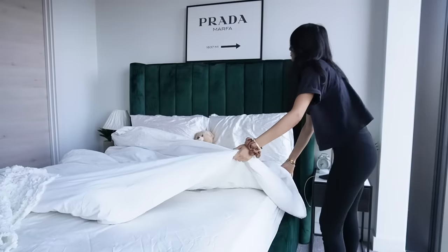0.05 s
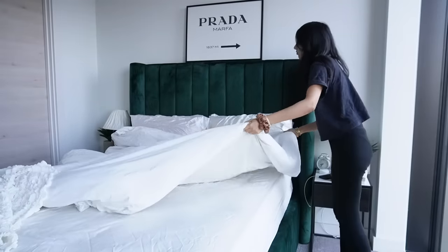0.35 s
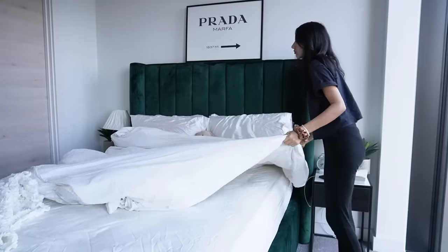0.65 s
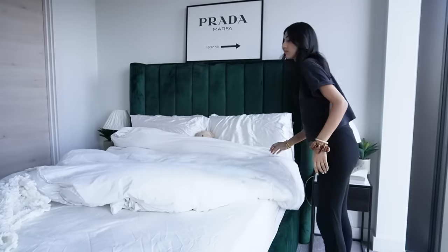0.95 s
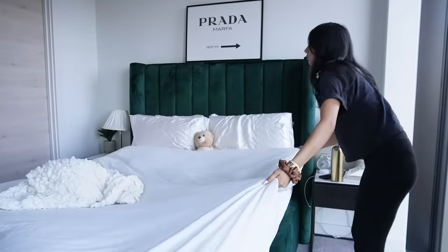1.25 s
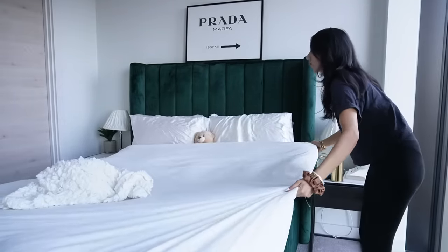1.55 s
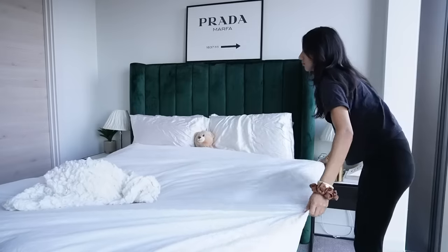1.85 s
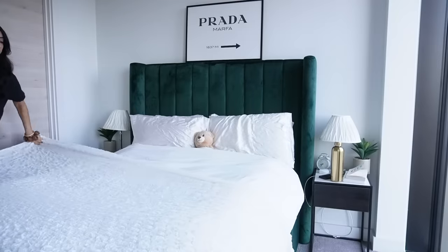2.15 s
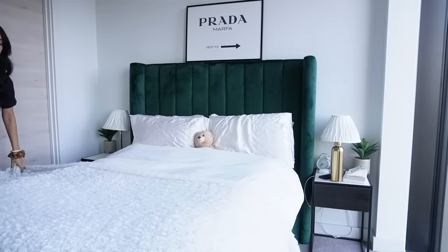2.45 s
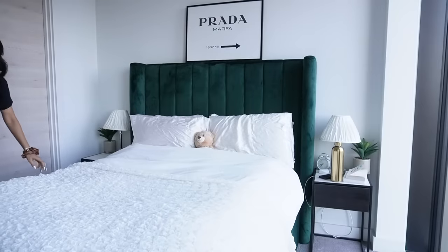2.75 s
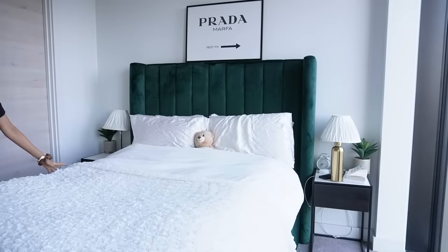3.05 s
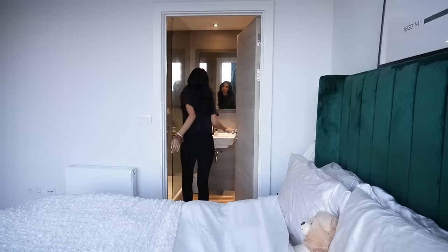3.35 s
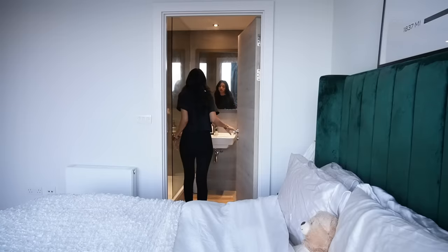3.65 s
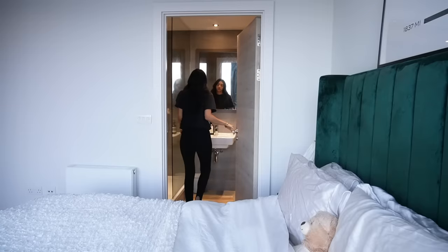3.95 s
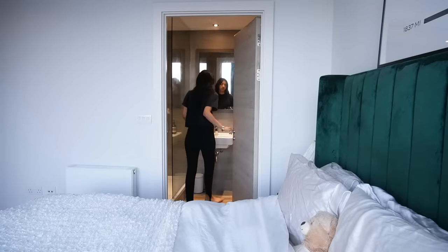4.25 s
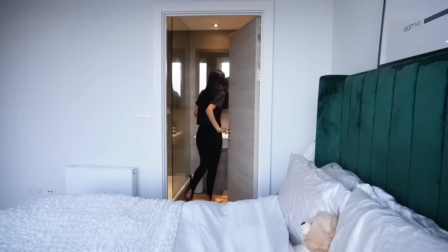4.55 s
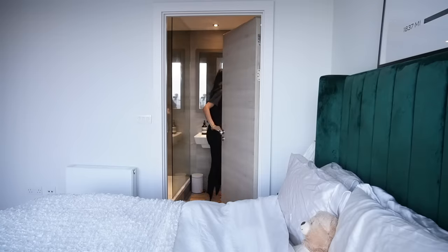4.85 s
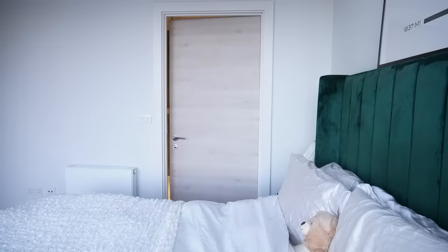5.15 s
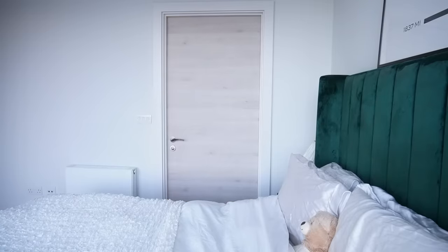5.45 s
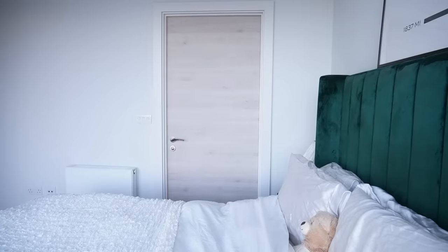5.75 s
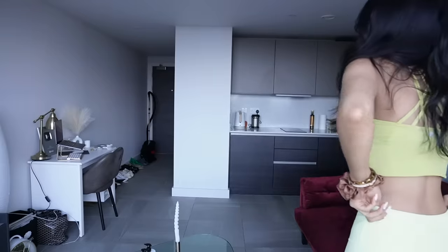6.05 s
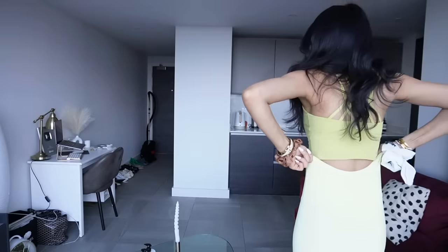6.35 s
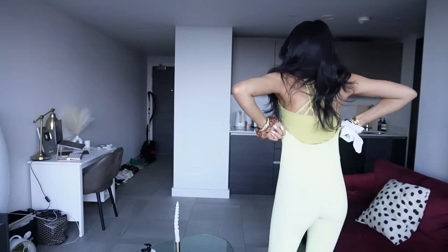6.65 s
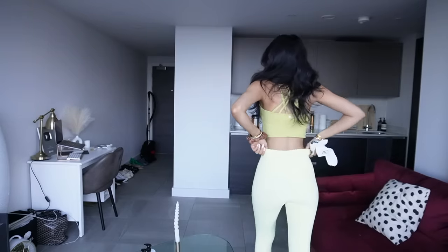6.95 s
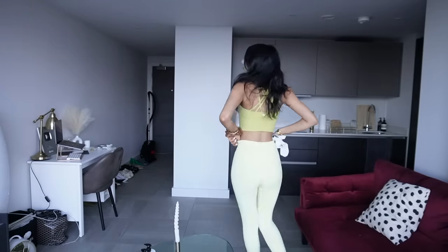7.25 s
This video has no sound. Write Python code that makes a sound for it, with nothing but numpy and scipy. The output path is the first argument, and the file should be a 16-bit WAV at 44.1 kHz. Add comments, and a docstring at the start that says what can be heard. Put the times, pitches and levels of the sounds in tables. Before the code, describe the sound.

In a quietly humming bedroom, a duvet is shaken, pulled and smoothed with swishes and soft puffs of air. Bracelets jingle and small hard things click at a bathroom basin. A door then shuts with a metal latch clack and a loud, booming thud. Finally, stretchy clothes are tugged up and a waistband snaps on skin, the bracelets now closer to the single microphone.

```python
"""Duvet, door and waistband

Three spots in a flat, one straight after the other, on one mono microphone. In a humming bedroom a duvet
is shaken, pulled and smoothed, cloth rubbing on cloth. Bracelets jingle at the bathroom basin, then the
door swings shut with a latch clack and a booming thud, held down by a limiter. In the living room, the
bracelets now nearer the microphone, tight clothes are tugged up and the waistband snaps on skin."""
import sys
import numpy as np
from scipy import signal
from scipy.fft import rfft, irfft, next_fast_len
from scipy.io import wavfile
from scipy.ndimage import uniform_filter1d

SR = 44100
rng = np.random.default_rng(int(sys.argv[2]) if len(sys.argv) > 2 else 0)


def bounce(signal):
    """Save signal as a 16-bit WAV file at the path given by the first command-line argument."""
    frames = np.transpose(np.atleast_2d(signal))
    limited = np.clip(frames, -1, 1)
    pcm = np.round(limited * 32767).astype(np.int16)
    wavfile.write(sys.argv[1], SR, pcm)


N = 321930
BATHROOM_S, LIVING_S = 3.12, 5.826   # when the second and third spots begin
TIME = np.arange(N) / SR
AGE = np.arange(SR) / SR   # seconds since a blow


def from_db(db):
    """Decibels to gain."""
    return 10 ** (np.asarray(db) / 20)


def rms_one(x):
    """Scale to unit rms."""
    return x / np.sqrt(np.mean(x ** 2) + 1e-20)


def fade(t60):
    """Decay of 60 dB in t60 seconds."""
    return np.exp(-np.log(1000) * AGE / t60)


def during(start, end, edge_s=0.0043):
    """One between start and end, with short ramps."""
    return np.clip(np.minimum(TIME - start, end - TIME) / edge_s + .5, 0, 1)


def add(out, start_s, sound):
    """Mix a sound in at the given time."""
    at = max(round(start_s * SR), 0)
    out[at:at + len(sound)] += sound[:N - at]


def drift(rate_hz):
    """A slow random wander with a spread of about 1."""
    knots = np.arange(0, N / SR + 1, 1 / rate_hz)
    return np.interp(TIME, knots, rng.standard_normal(N // 40)[:len(knots)]) * np.sqrt(3 / 2)


def colour(x, spectrum):
    """Causal (minimum-phase) filter with the given spectrum; white noise keeps its power."""
    size = 2 * next_fast_len(len(x) // 2 + SR // 20)
    hz, db = np.transpose(spectrum)
    log_bins = np.log(np.fft.rfftfreq(size, 1 / SR) + 1)
    gain = rms_one(from_db(np.interp(log_bins, np.log(hz), db)))
    cepstrum = irfft(np.log(gain))
    cepstrum[1:size // 2] *= 2
    cepstrum[size // 2 + 1:] = 0
    return irfft(rfft(x, size) * np.exp(rfft(cepstrum)))[:len(x)]


def resonate(x, hz, width):
    """One resonance; white noise keeps its power."""
    radius = np.exp(-np.pi * width / SR)
    feedback = [1, -2 * radius * np.cos(2 * np.pi * hz / SR), radius ** 2]
    return signal.lfilter(np.sqrt((1 - radius ** 2) / 2) * np.array([1, 0, -1]), feedback, x)


def blow(crack_db, crack_s, t60):
    """A short crack of contact, then dense room echoes that start at rms 1."""
    return rng.standard_normal(SR) * (from_db(crack_db) * np.exp(-AGE / crack_s) + fade(t60))


def room(x, wet_db, t60):
    """Direct sound reaches the microphone first, diffuse wall echoes a few milliseconds later."""
    tail = rng.standard_normal(SR) * fade(t60) * (AGE > .004)
    return x + from_db(wet_db) * signal.fftconvolve(x, tail / np.linalg.norm(tail))[:len(x)]


# still air in all three rooms: (frequency [Hz], density [dB])
AIR_COLOUR = [(15, -37), (28, -4), (48, 1), (74, -11.5), (137, -6), (175, -9), (380, -8), (480, -12.5),
              (850, -12), (1400, -21), (2800, -29), (6000, -32.5), (12000, -37.5), (16000, -41)]
# living-room ventilation: (frequency [Hz], width [Hz], level [dB])
VENT_BANDS = [(340.3, 4.2, -51.5), (512, 5.2, -58.5), (574, 11, -67)]
def room_tone(hum_hz=42.5):
    """Air all through; a building hum, strongest in the bedroom; a vent droning in the living room."""
    bedroom, living = during(-1, BATHROOM_S), during(LIVING_S, N / SR + 1)
    air = from_db(-48.5) * colour(rng.standard_normal(N), AIR_COLOUR)
    hum = np.sqrt(2) * np.sin(2 * np.pi * hum_hz * TIME + .15 * drift(5))
    hum_gain = from_db(-47.5) * bedroom + from_db(-53) * living
    rumble = from_db(-56.5) * resonate(rng.standard_normal(N), hz=81, width=70)
    vent = sum(from_db(db) * resonate(rng.standard_normal(N), hz, width) for hz, width, db in VENT_BANDS)
    return air + hum * hum_gain + rumble * bedroom + vent * living


def friction(spectrum, slips_per_s, slip_db, spread_db):
    """A smooth rush of threads plus separate slips of creases, split into folds, rubbing and hiss."""
    sizes = from_db(spread_db * np.minimum(rng.exponential(1, N), 4)) * rng.choice([-1, 1], N)
    slipping = rng.random(N) < slips_per_s * from_db(4 * drift(25)) / SR
    rub = colour(rng.standard_normal(N) + from_db(slip_db) * rms_one(sizes * slipping), spectrum)
    return [rms_one(signal.sosfilt(signal.butter(3, edges_hz, "band", fs=SR, output="sos"), rub))
            for edges_hz in [(110, 700), (700, 3500), (3500, 17000)]]


def stroke_speed(start, rise, hold, release):
    """A stroke gathers speed, keeps it, then slows to a tenth in each release time."""
    age = TIME - start
    gathering = np.sin(np.pi / 2 * np.clip(age / rise, 0, 1))
    slowing = 10 ** -np.clip((age - rise - hold) / release, 0, 10)
    return gathering * slowing


def stroke_gains(strokes, exponents=(0.86, 0.93, 1.12)):
    """Folds, rubbing and hiss each grow with the cloth's speed; overlapping strokes add in power."""
    power = np.zeros((3, N))
    for start, rise, hold, release, db, folds_db, hiss_db in strokes:
        speed = stroke_speed(start, rise, hold, release)
        for k, above_db in enumerate((folds_db, 0, hiss_db)):
            power[k] += (from_db(db + above_db) * speed ** exponents[k]) ** 2
    return np.sqrt(power)


def pull(registers, gains, flutter_db):
    """Cloth in motion; the heavy folds flutter most, the thread hiss least."""
    return sum(noise * gain * from_db(flutter_db * drift(45) / (k + 1))
               for k, (noise, gain) in enumerate(zip(registers, gains)))


# the duvet is lifted, billows, is pulled taut, swept flat and sinks into place: (time [s], rise [s],
# hold [s], release [s], rubbing level [dB], folds above rubbing [dB], hiss above rubbing [dB])
DUVET_STROKES = [ (-0.02, 0.02, 0.14, 1, -40.5, -3.5, -8.5), (0.15, 0.087, 0.19, 0.74, -41, 2, -6.5),
                 (0.42, 0.13, 0.21, 0.05, -41.5, -4, -3), (0.73, .045, 0.057, 0, -44.5, -3, 2),
                 (0.77, 0.052, 0.11, 0.1, -39.5, 1, -9), (1.033, 0.025, .12, 0.66, -33.8, -3.5, -7.5),
                 (1.28, 0.054, .03, 1, -44.5, -1, -0.5), (1.5, 0.057, .16, 0.34, -40.5, -1, -7),
                 (1.8, 0.083, 0.074, 0.16, -39, -2.5, -.5), (1.97, 0.043, .05, .2, -41.5, 0, -14),
                 (2.077, 0.016, 0.099, 0.29, -31, -7.5, -3), (2.35, .1, .2, 0.15, -45, -4, -4),
                 (2.6, 0.093, 0.31, 0.48, -53.5, 4, -20), ]
# its cloth when shaken, smoothed and swept: (frequency [Hz], density [dB])
SHAKE_COLOUR = [(59, -39), (100, -4), (224, -3), (283, 0.5), (415, -2.5), (524, 0), (648, -5.5),
                (705, -3.5), (2800, -14.5), (8280, -14.5), (10900, -22), (14700, -26), (16000, -34)]
SMOOTH_COLOUR = [(60, -37), (110, -16), (180, -10.5), (320, -0.5), (430, -4), (800, -4), (1300, -4.5),
                 (1800, -6.5), (2300, -10), (5000, -15), (8800, -15.5), (11000, -23.5), (16000, -27)]
SWEEP_COLOUR = [(60, -30), (110, -17), (200, -3), (430, -2), (600, -1.5), (1000, -1), (1700, -2.5),
                (2500, -6.5), (5000, -16.5), (8600, -17.5), (11000, -24.5), (16000, -29)]
def duvet(smooth_s=1.037, sweep_s=2.079):
    """In the bedroom, cloth rubs on cloth: shaking, smoothing, sweeping, each taking over abruptly."""
    out = np.zeros(N)
    gains = stroke_gains(DUVET_STROKES)
    edges = [-1, smooth_s, sweep_s, BATHROOM_S]
    for spectrum, start, end in zip([SHAKE_COLOUR, SMOOTH_COLOUR, SWEEP_COLOUR], edges, edges[1:]):
        registers = friction(spectrum, slips_per_s=900, slip_db=-5.5, spread_db=3.5)
        out += pull(registers, gains, flutter_db=0.9) * during(start, end)
    return from_db(-0.28) * out


# clear knocks of the bracelets: (time [s], level [dB], favoured frequency [Hz], ring [dB])
BRACELET_KNOCKS = [(0.002, -19.5, 9500, -5.5), (0.535, -28, 14500, -5), (0.596, -28.5, 5100, 1.5),
                   (0.767, -31.5, 9000, -3), (2.895, -34.5, 12000, -5), (3.127, -37, 8000, 1),
                   (3.184, -33, 7500, 0.5), (3.248, -29.5, 14700, 0.5), (3.362, -34.5, 8000, -1.5),
                   (3.564, -43, 12300, 5), (3.6, -36, 13000, 0), (3.772, -33.5, 10000, -2),
                   (4.215, -43, 13100, 4), (6.231, -25.5, 9000, -4), (6.285, -25, 8100, -6),
                   (6.386, -22, 9900, -14), (6.834, -23.5, 11480, 4), (7.006, -25, 8900, -1)]
# their resonances: (frequency [Hz], width [Hz], level [dB])
BRACELET_MODES = [(2660, 150, -13), (3770, 120, -8.5), (4230, 80, -12), (5060, 100, -4), (7760, 75, -2),
                  (8370, 200, -11), (9560, 120, -4), (10400, 200, -18), (11000, 150, -11), (12850, 90, -12),
                  (13130, 120, -8), (14520, 90, -9), (14950, 170, -11)]
# the tick of contact: (frequency [Hz], density [dB])
TICK_COLOUR = [(1500, -6.5), (4000, -7), (8500, 2.5), (11000, -6), (15500, -4)]
def bracelets(rebounds=4):
    """Knocks and weaker rebounds ring the bangles, nearer the microphone in the living room."""
    out = np.zeros(N)
    for start, db, favoured_hz, ring_db in list(BRACELET_KNOCKS) + chatter():
        near = start > LIVING_S   # more crack, less room
        knock = blow(crack_db=3.5 + 10 * near, crack_s=0.00086, t60=0.3) * from_db(-10 - 3.6 * near)
        ring = 0
        for hz, width, mode_db in BRACELET_MODES:
            # the point of contact favours modes close to one frequency
            favour_db = 9 * np.exp(-(np.log2(hz / favoured_hz) / 0.31) ** 2)
            ring += from_db(mode_db + favour_db + rng.normal(0, 4.1)) * resonate(knock, hz, width)
        tick = from_db(-3.5) * colour(knock, TICK_COLOUR)
        add(out, start, from_db(db) * (from_db(ring_db - 13.5) * ring + tick))
        for delay in rng.uniform(0.0068, .06, rebounds):
            add(out, start + delay, from_db(db + ring_db - 29) * ring)
    return out


# puffs from taut cloth, bumps on the bed and the swinging door:
# (time [s], level [dB], pitch [Hz], half-length [cycles])
AIR_PUFFS = [(0.219, -21.5, 620, 0.58), (0.231, -30, 330, 0.98), (0.441, -31, 310, .7),
             (0.83, -37, 80, 0.65), (0.905, -39, 85, 0.71), (0.928, -18, 520, 0.55), (1.039, -30, 210, .4),
             (1.042, -27, 900, .4), (2.068, -37.5, 80.5, .6), (2.842, -34.5, 139, 1.2),
             (2.888, -34, 150, 1.2), (5.341, -25.5, 397, 0.47), (6.961, -26.5, 810, 0.85),
             (7.261, -24.5, 1110, 0.59)]
def flaps(lead_cycles=3):
    """A moving fold or panel pushes one short puff of air, heard with the room around it."""
    out = np.zeros(N)
    for time, db, hz, cycles in AIR_PUFFS:
        turn = AGE * hz - lead_cycles
        puff = np.cos(2 * np.pi * turn) * np.exp(-(turn / cycles) ** 2)
        add(out, time - (lead_cycles - 1) / hz, from_db(db) * room(puff, wet_db=-1, t60=0.32))
    return out


# a hand skims taut cloth: (time [s], level [dB], frequency [Hz], width [Hz], swell [s])
HAND_SKIMS = [(1.034, -37, 1370, 680, 0.058), (2.084, -41, 460, 160, .045), (1.9, -42, 1900, 1700, .015),
              (5.82, -40, 1400, 320, 0.065)]
def skims():
    """Taut cloth resonates under the hand: a breathy band of friction swells and dies."""
    out = np.zeros(N)
    for start, db, hz, width, swell in HAND_SKIMS:
        rush = rms_one(resonate(resonate(rng.standard_normal(SR), hz, width), hz, width))
        envelope = AGE / swell * np.exp(1 - AGE / swell)
        add(out, start, from_db(db) * rush * envelope)
    return out


# spells of wrist movement: (start [s], end [s], level [dB], favoured frequency [Hz])
WRIST_MOVES = [(3.2, 3.54, -46.5, 4800), (4.37, 4.49, -43.5, 12000), (4.668, 4.71, -49, 12000),
               (6.399, 6.47, -28, 14500), (6.75, 6.96, -31, 12700)]
def chatter(gap_s=.06, spread_db=2, ring_db=3):
    """A moving wrist jostles the bracelets: faint, uneven knocks, as rows like BRACELET_KNOCKS."""
    knocks = []
    for start, end, db, hz in WRIST_MOVES:
        for k, (late, strength) in enumerate(rng.uniform(-1, 1, size=(12, 2))):
            time = start + gap_s * (k + 0.5 + late / 4)
            if time < end:
                knocks.append((time, db + spread_db * strength, hz, ring_db))
    return knocks


# hard things handled at the basin: (time [s], level [dB], ring frequency [Hz], ring [dB])
BASIN_CLICKS = [(3.775, -53.5, 7800, 4), (3.835, -48, 3160, -1), (4.237, -33, 8540, -10),
                (4.494, -47.5, 4100, -16), (4.773, -62.5, 7300, -4), (5.331, -65, 3540, 0)]
# the tone they share: (frequency [Hz], density [dB])
BASIN_COLOUR = [(600, -47), (1000, -6), (1400, 3), (2500, -0.5), (4300, -1), (5400, 6.5), (6800, -4.5),
                (8600, 5), (10000, -15), (13000, -13), (16000, -11)]
def basin():
    """Small hard clicks echo off the bathroom tiles, each thing with its own short ring."""
    out = np.zeros(N)
    for start, db, hz, ring_db in BASIN_CLICKS:
        knock = blow(crack_db=-5, crack_s=0.0067, t60=0.45)
        ring = from_db(ring_db) * resonate(knock, hz, width=200)
        add(out, start, from_db(db) * (colour(knock, BASIN_COLOUR) + ring))
    return out


# air rushing through the door's last gap: (frequency [Hz], density [dB])
DRAUGHT_COLOUR = [(30, -6), (60, 2), (150, -8), (500, 0), (1000, -6), (2000, -13), (5000, -30),
                  (10000, -49)]
def draught(peak_db=-38, rise_s=0.05):
    """The closing door squeezes air through the narrowing gap until the latch strikes."""
    strike_s = LATCH_HITS[0][0]
    swell = np.exp(np.minimum(TIME - strike_s, 0) / rise_s) * during(BATHROOM_S, strike_s)
    return from_db(peak_db) * swell * colour(rng.standard_normal(N), DRAUGHT_COLOUR)


# the latch hits the strike plate, rides over it and drops in: (time [s], level [dB])
LATCH_HITS = [(5.3842, -16), (5.387, -12.5), (5.400, -17), (5.509, -22.5), (5.531, -16), (5.538, -21.5)]
# its clack: (frequency [Hz], density [dB])
LATCH_COLOUR = [(35, -31), (60, -7.5), (160, -19), (270, -26), (450, -14.5), (900, -4.5), (1400, -4),
                (2200, -3), (3300, -6), (8200, -10), (10500, -21), (14000, -32), (16000, -40)]
# resonances of latch and plate: (frequency [Hz], width [Hz], level [dB])
LATCH_MODES = [(920, 90, -18), (1140, 61, -13), (1380, 58, -16), (1578, 30, -13), (1876, 27, -15),
               (2020, 30, -15.5), (2715, 30, -24), (4500, 46, -17), (5000, 41, -25), (7400, 90, -19.5)]
def latch():
    """Metal clacks on metal at the bathroom door, and latch and plate ring."""
    hits = np.zeros(N)
    for start, db in LATCH_HITS:
        add(hits, start, from_db(db) * blow(crack_db=7, crack_s=0.0033, t60=0.41))
    ring = sum(from_db(db) * resonate(hits, hz, width) for hz, width, db in LATCH_MODES)
    return colour(hits, LATCH_COLOUR) + ring


# the door leaf jolts, then meets its frame: (time [s], level [dB])
DOOR_HITS = [(5.40, -26), (5.537, -4)]
# its wooden thud: (frequency [Hz], density [dB])
THUD_COLOUR = [(59, -20), (100, -10), (129, -5), (255, -13.5), (358, -9.5), (442, -10), (691, -8.5),
               (752, -10), (970, -6.5), (1060, -9), (1150, -7), (1720, -19), (8110, -43.5), (12900, -86),
               (16000, -80)]
# modes of the leaf and the bathroom: (frequency [Hz], level [dB], time to fade by 60 dB [s])
BOOM_MODES = [(53.6, -1, 0.63), (60.3, -9, .44), (90, -1.5, .8), (122.5, 3, 0.51), (160, -16, .89),
              (214, -16.5, .85), (286, -16.5, .77), (318, -10, .57), (356, -7, 0.7), (373.4, -9.5, 0.74),
              (528.6, -10.5, .6), (619, -10, 0.57), (685, 11, 0.06), (740, -8, .64), (837, -8.5, 0.58),
              (906, -4.5, .51), (993, -1.5, 0.36), (1141, -9.5, .72)]
def door():
    """The wooden leaf thuds into its frame and its modes boom through the bathroom."""
    thud, boom = np.zeros((2, N))
    # each mode takes a few cycles to build up, so the bass arrives last
    modes = sum(from_db(db) * np.sin(2 * np.pi * hz * AGE) * fade(t60) * (1 - np.exp(-AGE * hz / 3.8))
                for hz, db, t60 in BOOM_MODES)
    for start, db in DOOR_HITS:
        add(thud, start, from_db(db) * blow(crack_db=-14, crack_s=0.017, t60=0.62))
        add(boom, start, from_db(db) * modes)
    return from_db(1) * colour(thud, THUD_COLOUR) + from_db(-1) * boom


# tugs at the clothes: (time [s], rise [s], hold [s], release [s], rubbing level [dB],
# folds above rubbing [dB], hiss above rubbing [dB])
CLOTHES_TUGS = [ (5.82, 0.023, 0.2, 0.43, -38, -8, -8.5), (6.17, .12, .27, .4, -45, -1.5, 4.5),
                (6.73, 0.085, 0.12, 0.21, -45.5, -6, 5), (6.94, 0.056, 0.16, 0.47, -47.5, 0, -4.5),
                (7.14, 0.088, .06, .3, -43.5, -6, -4.5), ]
# stretchy fabric: (frequency [Hz], density [dB])
CLOTHES_COLOUR = [(59, -38), (100, -1), (255, -1), (335, -3), (471, -7.5), (705, -3.5), (1030, -4),
                  (1420, -1.5), (2470, -7), (6290, -8.5), (7940, -5), (15000, -22), (16000, -21)]
def clothes():
    """In the living room, hands drag stretchy fabric over skin."""
    registers = friction(CLOTHES_COLOUR, slips_per_s=350, slip_db=-11.5, spread_db=7.5)
    return pull(registers, stroke_gains(CLOTHES_TUGS), flutter_db=1.9)


# elastic snapping on the body: (time [s], level [dB], ring [dB])
ELASTIC_SNAPS = [(5.939, -33.5, -22), (5.956, -35.5, -20), (6.6106, -27.5, -1.5)]
# its slap: (frequency [Hz], density [dB])
SNAP_COLOUR = [(88, -38), (150, -17), (448, -0.5), (524, -0.5), (1120, -2.5), (2020, -5), (5460, -12.5),
               (7470, -11), (11700, -38), (14500, -26), (16000, -30)]
# jewellery shaken by the snap: (frequency [Hz], width [Hz], level [dB])
JEWELLERY_MODES = [(7330, 150, -8.5), (8500, 400, -9)]
def waistband():
    """Elastic slaps the skin and the living room echoes; the hardest snap rings the jewellery."""
    out = np.zeros(N)
    for start, db, ring_db in ELASTIC_SNAPS:
        slap = blow(crack_db=13.5, crack_s=0.00071, t60=0.57)
        ring = sum(from_db(level) * resonate(slap, hz, width) for hz, width, level in JEWELLERY_MODES)
        add(out, start, from_db(db) * (colour(slap, SNAP_COLOUR) + from_db(ring_db) * ring))
    return out


def scene():
    """Bedroom, bathroom and living room in turn, as they reach one microphone."""
    bathroom = (basin() + draught() + latch() + door()) * during(BATHROOM_S, LIVING_S)
    living = (clothes() + waistband()) * during(LIVING_S, N / SR + 1)
    return (duvet() + skims() + flaps() + bracelets() + bathroom + living + room_tone())[None]


def record(dry, ceiling_db=-8.5, release_db_per_s=90, saturation=1.1, cutoff_hz=16000):
    """After the microphone, a limiter ducks the slam; stray peaks are rounded and the top is cut."""
    level_db = 10 * np.log10(np.abs(uniform_filter1d(dry[0] ** 2, size=441)) + 1e-12)   # over 10 ms
    over_db = np.maximum(level_db - ceiling_db, 0)
    recovery_db = release_db_per_s * TIME
    reduction_db = np.maximum.accumulate(over_db + recovery_db) - recovery_db
    rounded = saturation * np.tanh(dry * from_db(-reduction_db) / saturation)
    return signal.sosfilt(signal.ellip(10, .2, 80, cutoff_hz, fs=SR, output="sos"), rounded)


dry = scene()
out = record(dry)
bounce(out)
```